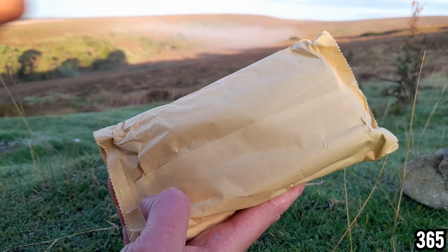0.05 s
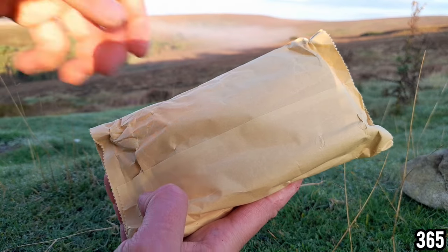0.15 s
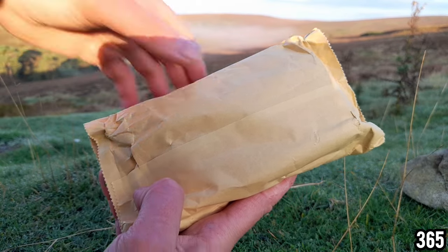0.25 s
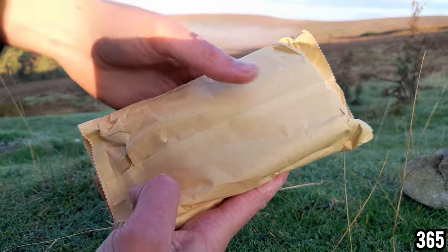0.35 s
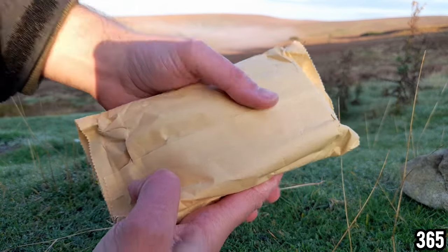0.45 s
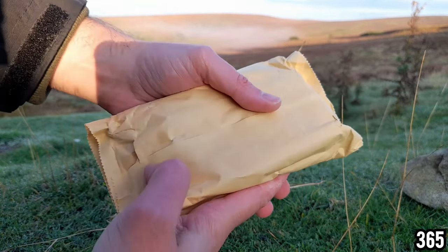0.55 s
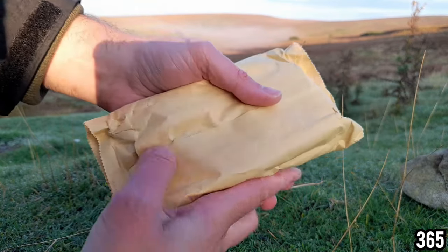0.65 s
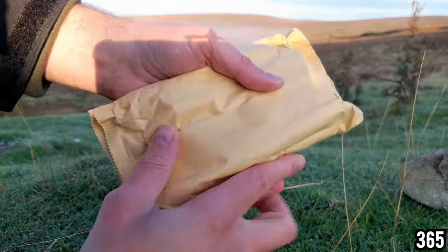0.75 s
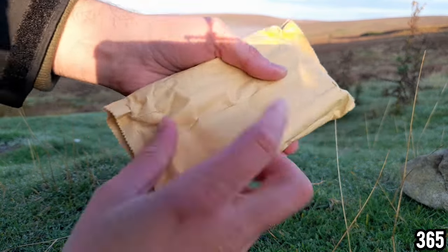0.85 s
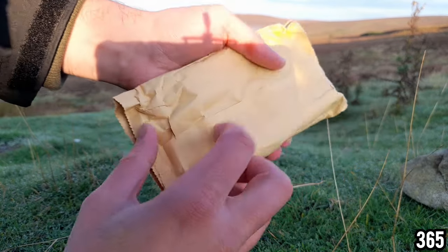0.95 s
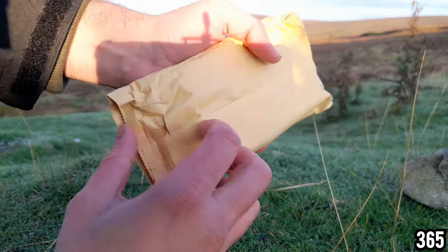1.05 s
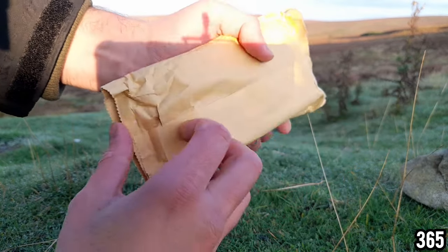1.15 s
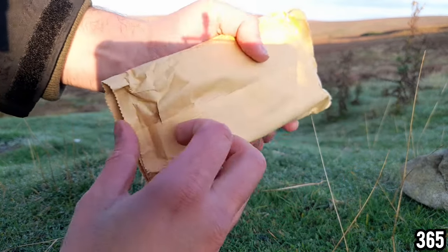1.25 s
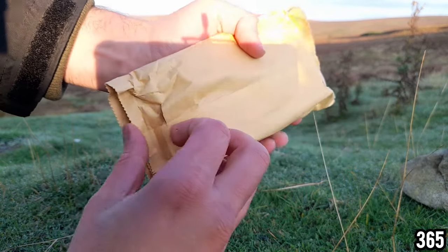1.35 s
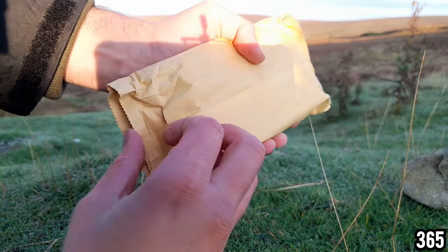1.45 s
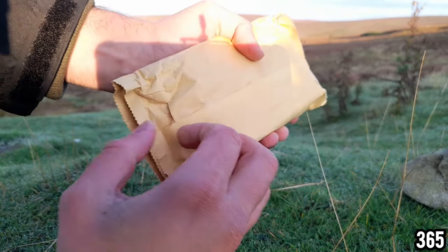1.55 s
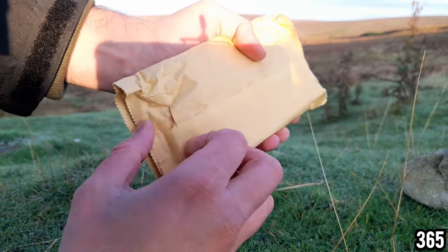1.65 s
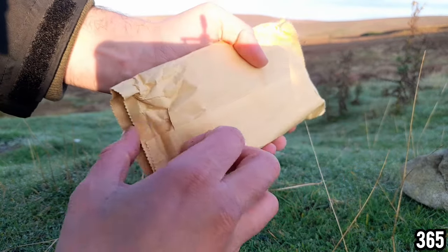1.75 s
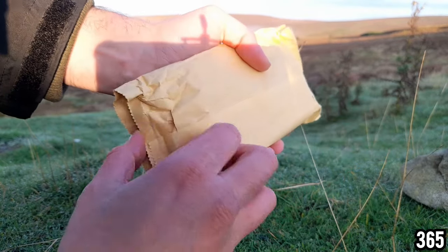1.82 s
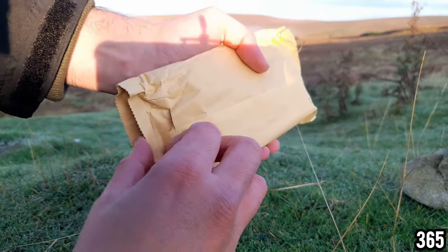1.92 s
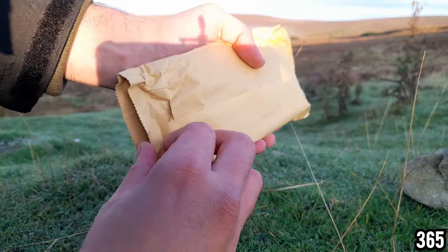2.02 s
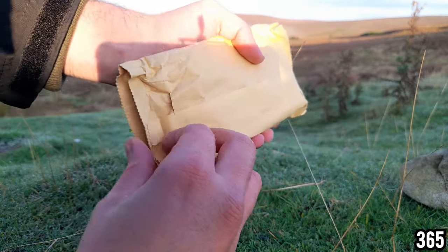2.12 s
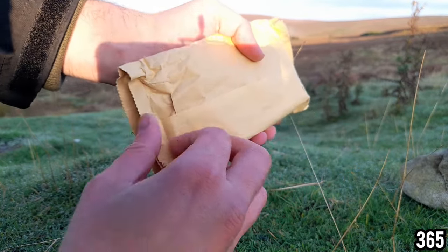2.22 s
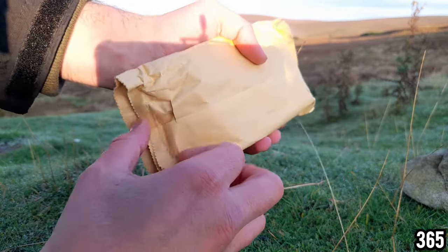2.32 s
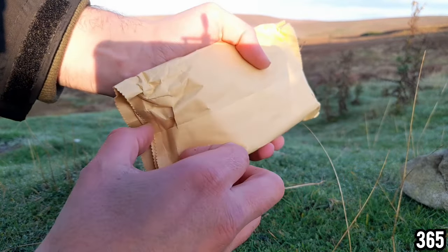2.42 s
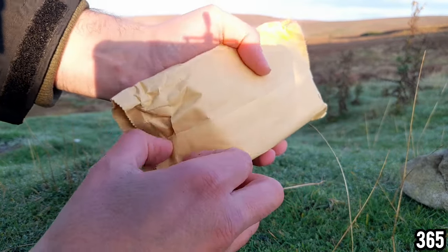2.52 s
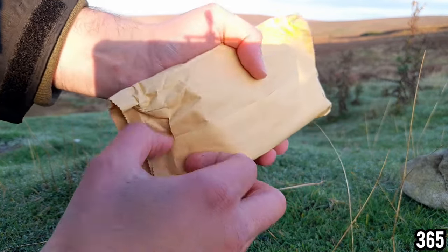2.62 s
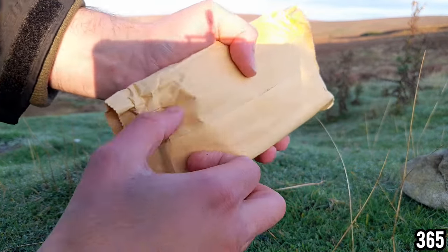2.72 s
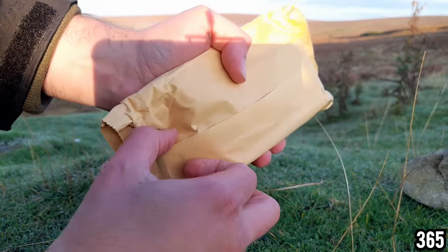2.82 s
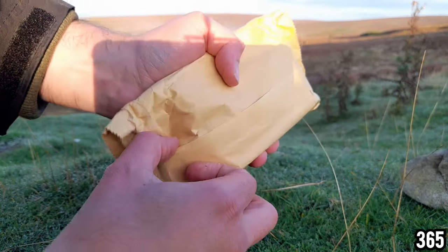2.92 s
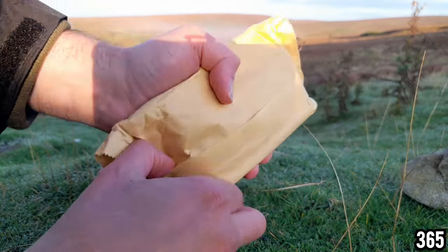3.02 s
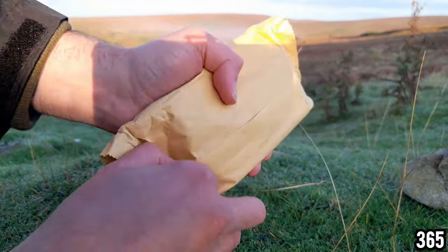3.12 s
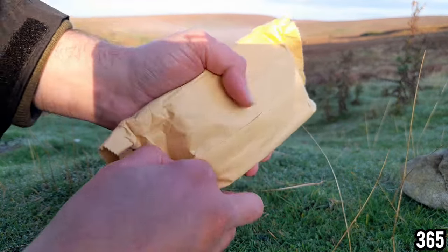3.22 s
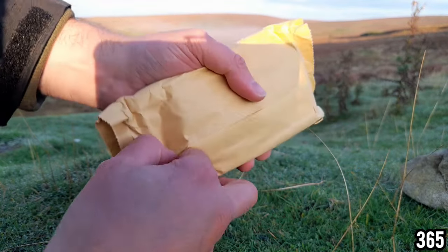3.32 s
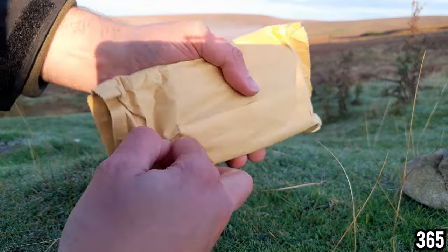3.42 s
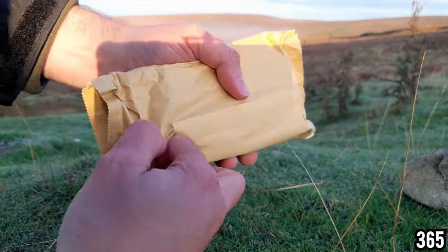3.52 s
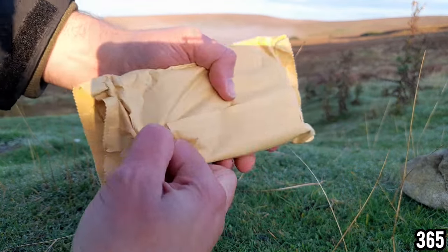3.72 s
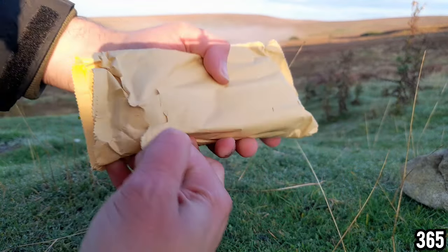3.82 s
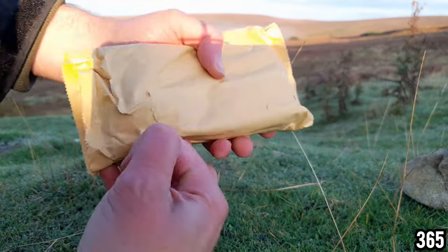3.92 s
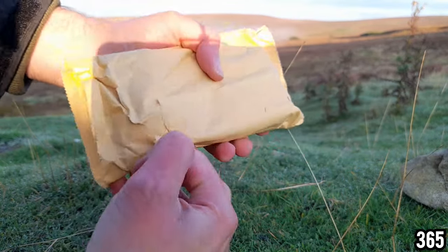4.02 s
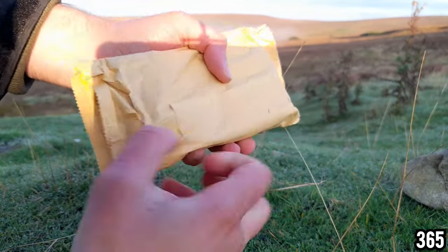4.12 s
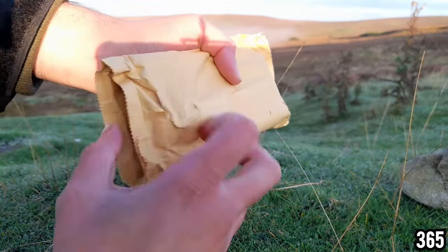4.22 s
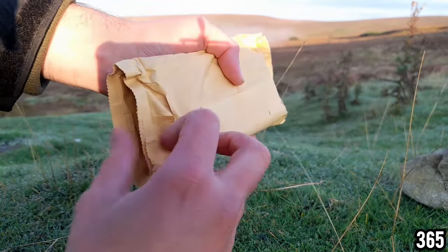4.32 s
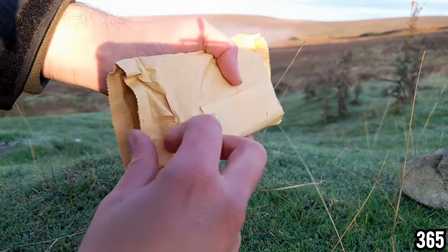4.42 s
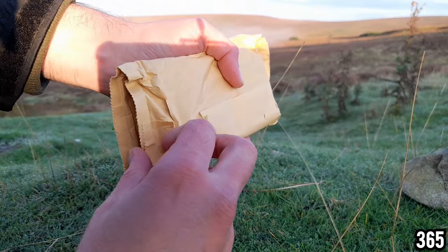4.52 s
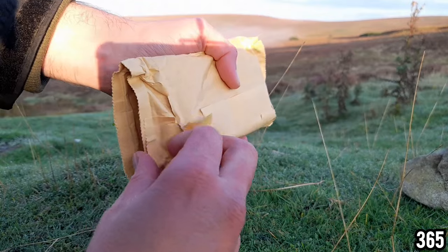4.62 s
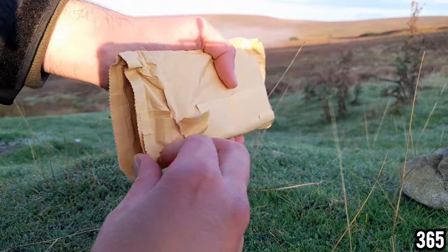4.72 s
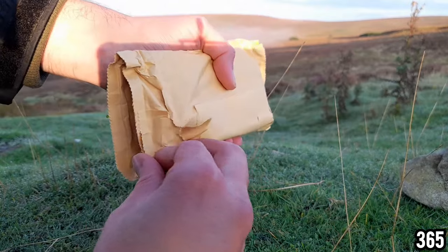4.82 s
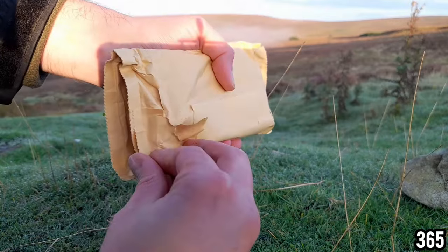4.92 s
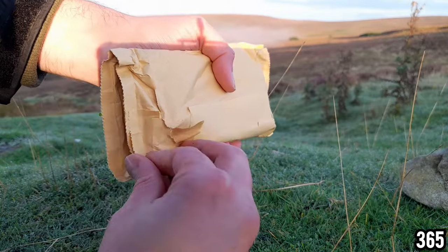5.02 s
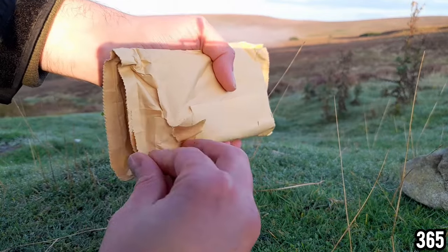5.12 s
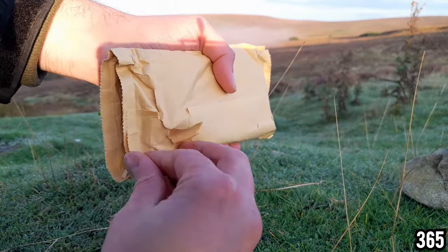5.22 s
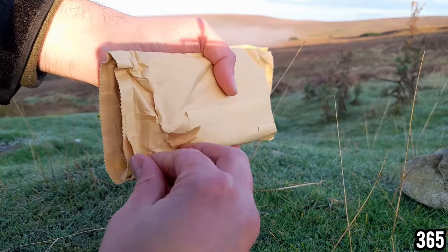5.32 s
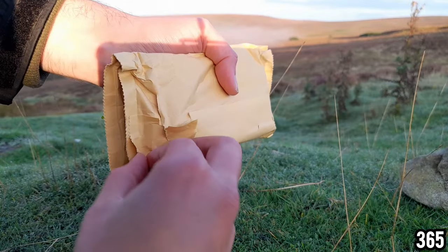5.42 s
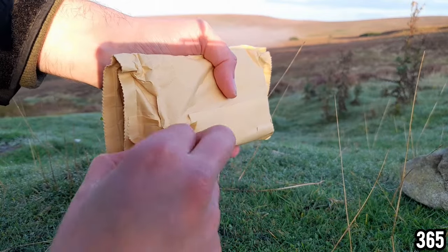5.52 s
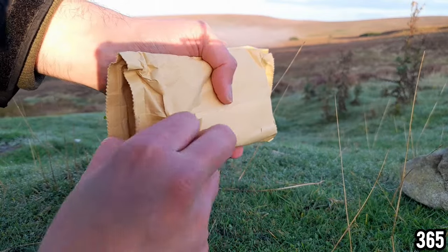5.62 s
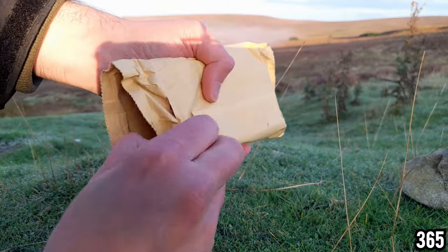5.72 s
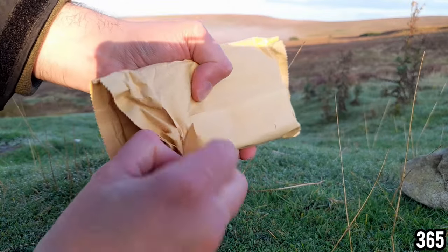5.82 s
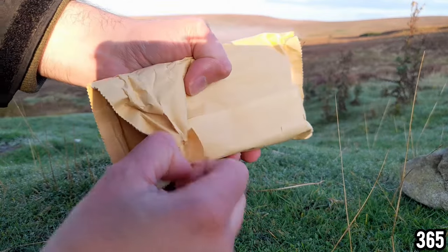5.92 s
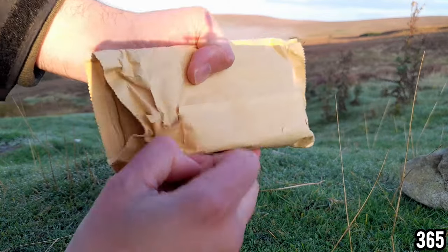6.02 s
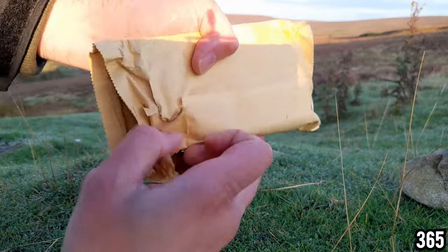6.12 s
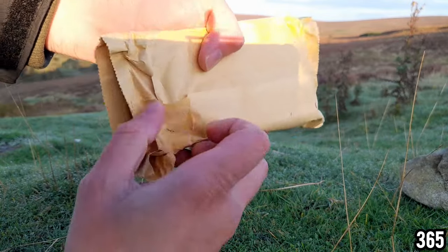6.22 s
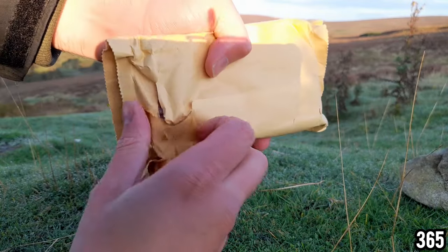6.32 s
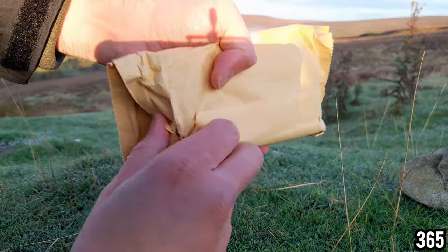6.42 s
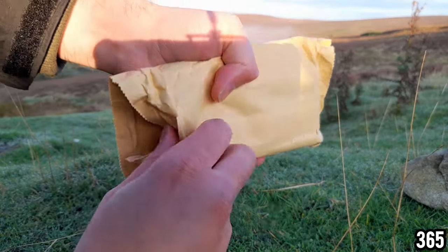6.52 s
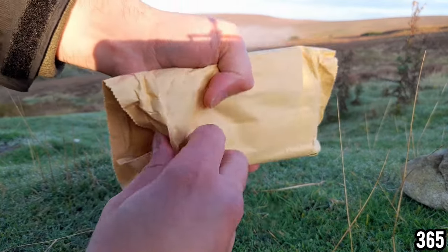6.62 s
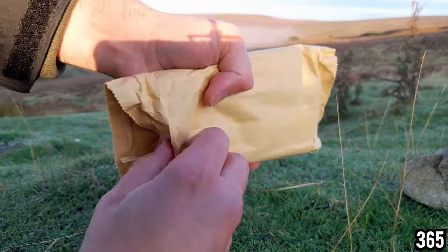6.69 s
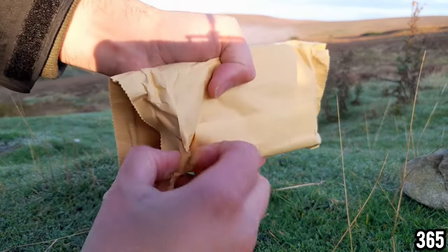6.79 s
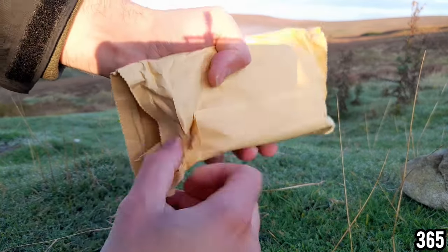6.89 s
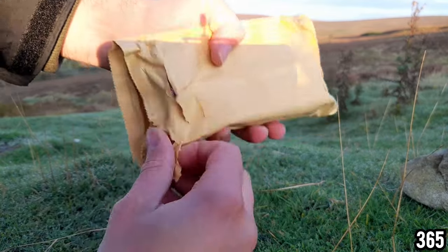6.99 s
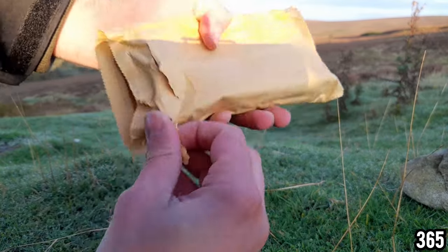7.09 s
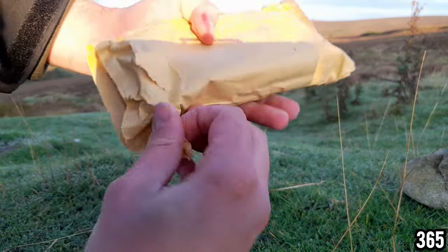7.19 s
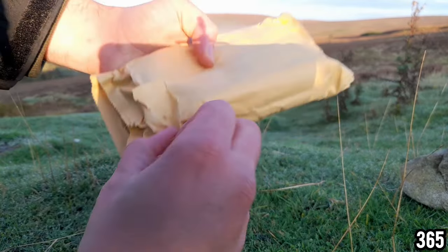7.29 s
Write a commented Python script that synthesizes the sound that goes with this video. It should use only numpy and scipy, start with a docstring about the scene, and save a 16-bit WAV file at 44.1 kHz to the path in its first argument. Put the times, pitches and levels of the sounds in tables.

```python
"""Outdoors on an open moor, hands crinkle, rub and tear a padded paper mailer close to two microphones.
Showers of tiny noise puffs make the dense rustle, and short noise bursts make the creases snap or tick.
Denser puffs make short tears and bright bursts of rustle, a finger drags over the opened pocket, and the
hands rest for a moment.
The mailer is nearer the left microphone; steady noise makes the faint air, and there is no echo."""
import sys
import numpy as np
from scipy import signal
from scipy.fft import rfft, irfft
from scipy.io import wavfile
from scipy.ndimage import uniform_filter1d

SR = 44100
rng = np.random.default_rng(int(sys.argv[2]) if len(sys.argv) > 2 else 0)


def unload_audio(sound):
    """Save the sound as a 16-bit wav file, at the path given as the first command line argument."""
    columns = np.transpose(np.atleast_2d(sound))
    # keep every value between -1 and 1, then stretch to whole-number steps
    steps = np.round(np.clip(columns, -1, 1) * 32767)
    wavfile.write(sys.argv[1], SR, steps.astype(np.int16))


N = 324135


def rustle():
    """Fibres hiss in fine grains, the sheet ticks in coarser ones, and the padding thuds."""
    pad, pocket, sheet, crack, shine = parts()
    layers = [crackle(pad, per_s=53, spread_db=-0.5, grain_s=0.0032, smooth=2.7),
              crackle(pocket, per_s=180, spread_db=1.0, grain_s=0.0018, smooth=1.0),
              crackle(sheet, per_s=250, spread_db=4.0, grain_s=0.0066, smooth=0.93),
              crackle(crack, per_s=1100, spread_db=0.5, grain_s=0.0013, smooth=1.6),
              crackle(shine, per_s=900, spread_db=9.0, grain_s=0.00063, smooth=2.1)]
    return sum(evened(patchy(layer, patchy_db=2.5)) * level for layer, level in zip(layers, handling()))


def handling():
    """Working hands rub, ring and press the paper, which sets the levels of its five parts."""
    # hands at work: time_s, fibre_hiss_db, sheet_ring_db, weight_on_padding_db
    hand_moves = [(0.0, -71, -85, -77.5), (0.18, -61.5, -68.5, -64), (0.4, -59.5, -65, -70),
                  (0.42, -52, -53.5, -66), (0.49, -52.5, -60, -60), (0.51, -48, -45, -44.5),
                  (0.6, -48, -51.5, -56.5), (0.655, -49, -50, -46.5), (0.72, -46.5, -59.5, -65),
                  (0.84, -50, -52.5, -63.5), (1.03, -48, -54, -67.5), (1.13, -43.5, -43, -50),
                  (1.17, -50, -54, -52), (1.19, -59, -63, -74), (1.44, -49.5, -54, -68),
                  (1.52, -60, -64, -66), (1.59, -64.5, -63.5, -83), (1.75, -52.5, -59, -56),
                  (1.9, -63, -65, -71), (1.945, -55, -59.5, -56.5), (1.99, -65, -72.5, -64.5),
                  (2.07, -61, -63, -53.5), (2.18, -77.5, -77, -89), (2.301, -49.5, -49.5, -48.5),
                  (2.43, -57, -63.5, -66), (2.51, -46.5, -48.5, -47), (2.6, -67, -69, -72),
                  (2.681, -44.5, -39, -44), (2.72, -60, -66, -54), (2.77, -44.5, -43, -51),
                  (2.81, -41.5, -46.5, -55), (2.9, -62.5, -73, -65.5), (2.978, -44, -54.5, -52.5),
                  (3.12, -52.5, -58.5, -73), (3.2, -52.5, -60.5, -61), (3.33, -48.5, -57, -70),
                  (3.37, -46.5, -51, -48), (3.48, -48, -54.5, -63.5), (3.66, -50, -57, -60),
                  (3.69, -48, -47, -57), (3.73, -51, -57, -57), (3.78, -41, -46, -50),
                  (3.87, -53, -57, -59), (3.89, -43, -48, -61), (3.97, -58, -60.5, -69),
                  (4.12, -61, -65, -71), (4.15, -70, -73, -76), (4.19, -68.5, -71, -79),
                  (4.331, -58.5, -56.5, -55.5), (4.43, -70, -70, -80), (4.55, -64, -61.5, -63.5),
                  (4.61, -69, -77, -91), (4.651, -60.5, -63, -69), (4.74, -69.5, -74, -80),
                  (4.78, -63.5, -69.5, -90), (4.82, -77.5, -78.5, -85), (4.91, -80, -92.5, -84.5),
                  (4.93, -75.5, -76.5, -84.5), (5.0, -87, -94, -87), (5.14, -90, -101, -87),
                  (5.2, -81.5, -81, -69), (5.28, -74, -85, -87), (5.35, -78.5, -86, -86),
                  (5.44, -65, -64, -85), (5.48, -63, -73, -86), (5.7, -45, -47.5, -59),
                  (5.75, -50.5, -57.5, -65.5), (5.96, -45, -53, -60), (6.08, -54.5, -55.5, -58),
                  (6.139, -46, -50.5, -43), (6.2, -56, -56, -57), (6.26, -43.5, -50, -52.5),
                  (6.34, -57, -60, -56), (6.4, -50.5, -53.5, -51), (6.48, -49.5, -52.5, -52),
                  (6.55, -62, -63, -61), (6.6, -57.5, -60, -61.5), (6.67, -68.5, -71, -73),
                  (6.75, -53, -65, -74), (6.8, -65, -60, -67), (6.85, -59, -58.5, -78),
                  (6.98, -46, -49, -59), (7.05, -54.5, -57, -69), (7.17, -42, -48, -48),
                  (7.23, -45, -50.5, -60.5), (7.35, -45.5, -43, -55)]
    # the rustle's shine over its hiss: time_s, level_db
    shine_over_hiss = [(0, 4), (0.5, -3), (1.4, -3), (2.8, -2), (3.9, 0.5), (4.6, -1), (5.3, 2.5), (6.1, 0),
                       (6.9, 1.5), (7.35, -3)]
    pocket_over_weight_db, padding_over_weight_db = -3.5, -2.5
    ring_share = 0.4  # how far the pocket's level moves from the weight towards the ring

    t = np.arange(N) / SR
    time_s, *columns = np.transpose(hand_moves)
    hiss_db, ring_db, weight_db = (np.interp(t, time_s, column) for column in columns)
    pad_db = weight_db + padding_over_weight_db
    pocket_db = weight_db + ring_share * (ring_db - weight_db) + pocket_over_weight_db
    shine_db = hiss_db + np.interp(t, *np.transpose(shine_over_hiss))
    return gain_of([pad_db, pocket_db, ring_db, hiss_db, shine_db])


def snaps():
    """Each buckling crease is a burst about a millisecond long that excites all five parts at once."""
    time_s, pocket_db, sheet_db, crack_db, crack_hz, shine_db, lean_db = creases()
    count = len(time_s)
    # the padding follows the pocket 9.5 dB lower, with an uneven spread of 7 dB
    pad_db = pocket_db - 9.5 + 7 * rng.standard_normal(count)
    shine_hz = rng.uniform(8400, 15000, count)

    t = np.arange(4096) / SR
    hz = np.fft.rfftfreq(4096, 1 / SR)
    levels = pad_db, pocket_db, sheet_db, crack_db, shine_db
    shapes = [1, 1, 1, favour(crack_hz, hz), favour(shine_hz, hz)]
    bursts_s = 0.00092, 0.0012, 0.00037, 0.00048, 0.00061  # time each burst takes to reach its peak
    out = np.zeros((2, N + 4096))
    for taps, db, shape, burst_s in zip(parts(), levels, shapes, bursts_s):
        envelope = (t / burst_s * np.exp(-t / burst_s))[:600]
        burst = rng.standard_normal((count, 2, 600)) * envelope
        hits = irfft(rfft(burst, 4096) * rfft(taps, 4096) * shape, 4096)
        hits = hits / abs(hits).max(axis=2, keepdims=True) * gain_of(db)[:, None, None]
        for at, hit in zip(np.round(time_s * SR).astype(int), hits):
            out[:, at:at + 4096] += hit

    # creases lie at different spots: the newest one sets the lean, from half a millisecond before it
    newest = np.searchsorted(np.sort(time_s), np.arange(N) / SR + 0.0005) - 1
    newest = np.maximum(newest, 0)
    half_each = np.array([[0.5], [-0.5]])  # left gains half the lean, right loses half
    return microphones(out[:, :N]) * gain_of(lean_db[newest] * half_each)


def creases(count=130):
    """Creases at set times, and small ones at random times whose strength follows the rustle."""
    # creases at set times, from loud snaps to faint ticks;
    # peaks are those before the microphones, lean is extra left over right:
    # time_s, pocket_peak_db, sheet_peak_db, crack_peak_db, crack_pitch_hz, shine_peak_db, lean_db
    set_creases = [(0.422, -43, -33.5, -43, 4700, -50, -1), (0.497, -38, -32, -30.5, 3980, -41, 1),
                   (0.518, -38, -35, -26, 3400, -41, -9), (0.54, -44, -18.5, -18, 3900, -27, 0),
                   (0.559, -56, -34, -30, 5000, -42, -3), (0.646, -38, -28, -24, 4000, -29, 1),
                   (0.666, -41, -27, -31, 2800, -45, -5), (0.689, -49, -25.5, -24, 3740, -42, -4),
                   (0.842, -40.5, -27, -44, 4600, -47, 0), (0.911, -40, -43, -36, 5200, -27, -6),
                   (1.003, -68, -37, -37, 4300, -44, -16), (1.09, -51, -23, -37, 3100, -33, -5),
                   (1.126, -32.5, -17.5, -16, 2600, -29, -5.5), (1.151, -51, -42, -21, 4700, -29.5, 0),
                   (1.165, -37, -22.5, -41, 3300, -32, -5), (1.375, -61, -34.5, -26, 4230, -34, -3),
                   (1.494, -44, -35.5, -31, 3830, -48, 1.5), (2.21, -48, -54, -48, 4800, -49, 6.5),
                   (2.299, -56, -46, -28.5, 3200, -36, -4), (2.397, -54, -56, -32, 4700, -35, 2),
                   (2.501, -27.5, -24.5, -23, 4800, -27, -10), (2.66, -35.5, -36, -32, 4270, -36, -2),
                   (2.674, -45, -28, -34, 4400, -28.5, -4), (2.689, -47, -28, -29, 4800, -25.5, -1),
                   (2.714, -56, -30, -27.5, 3980, -42, -7), (2.75, -35, -25, -30, 4000, -34, -4),
                   (2.768, -33.5, -17, -29, 5600, -29, 4.5), (2.83, -54, -32.5, -37, 4900, -37, -5),
                   (2.926, -67, -40, -35, 3100, -55, 2), (3.041, -59, -50, -30, 5000, -26, -4),
                   (3.083, -62, -41, -34, 6000, -29, -3), (3.22, -67, -53, -37, 4500, -32.5, -2),
                   (3.259, -66, -29, -25.5, 4100, -26, -4), (3.296, -55, -25, -29, 3900, -43, 1),
                   (3.313, -46, -28, -37, 3200, -45, -6), (3.347, -45, -24, -22.5, 4830, -25, -5),
                   (3.365, -46, -29, -20, 3100, -37, -3), (3.375, -19, -7, -26, 4800, -17.5, -2),
                   (3.414, -46, -23, -26, 3100, -34, -6), (3.467, -43, -29, -33, 4100, -25, -5),
                   (3.531, -47, -28, -45, 2600, -41, -6), (3.575, -60, -36, -28, 5500, -30, -4),
                   (3.635, -40, -18.5, -18.5, 5030, -22.5, -5), (3.664, -45, -21.5, -28, 3500, -37, 6),
                   (3.681, -45, -18.5, -23.5, 5600, -4.5, -8.5), (3.688, -27, -16.5, -22, 6130, -17, -9),
                   (3.692, -33, -16.5, -27, 4800, -38, 0), (3.757, -34, -23, -38, 3100, -45, 0),
                   (3.79, -27, -25, -9.5, 5760, -11, -8), (3.811, -35, -16, -10, 6000, -20, 3),
                   (3.871, -58, -34, -43, 4700, -44, 1), (3.888, -45, -23, -30, 5200, -20.5, -0.5),
                   (3.906, -54, -32, -24, 5300, -30, 4), (4.201, -64, -38, -43, 4260, -43, 0),
                   (4.222, -68, -38, -29.5, 4600, -31, 1), (4.238, -60, -36, -37, 4700, -34, 2),
                   (4.295, -55, -32.5, -44, 3400, -45, -1), (4.338, -55, -34.5, -37, 2800, -42, -4.5),
                   (4.831, -89, -76.5, -48.5, 5680, -56.5, -9), (5.039, -93.5, -79, -52, 6100, -48, -4.5),
                   (5.069, -88, -71, -51.5, 5200, -53.5, 2), (5.128, -91.5, -79.5, -56.5, 5280, -55, -4.5),
                   (5.198, -58, -56, -36, 5170, -33.5, 3.5), (5.271, -87.5, -69, -56, 5800, -49.5, 2),
                   (5.305, -83, -70, -48.5, 5300, -58, -3), (5.372, -89.5, -61, -55, 6010, -47, 2),
                   (5.415, -85.5, -64.5, -48.5, 5100, -43.5, 0), (5.631, -55, -33, -29, 6030, -20.5, -4),
                   (5.682, -61, -30, -17, 5130, -22.5, -4), (5.701, -35.5, -24, -35, 4600, -36, -9),
                   (5.795, -37.5, -24, -13, 4260, -12, 1.5), (5.862, -39.5, -25.5, -16.5, 4670, -27, 2),
                   (5.899, -48, -23.5, -20, 3830, -29, -4), (5.918, -53, -25, -22, 5300, -31, -4),
                   (5.959, -27, -11.5, -21.5, 5100, -13, 7), (5.987, -28, -28, -19, 6000, -18, -4),
                   (6.056, -54, -33, -32, 4400, -31, -1), (6.391, -59, -47, -45, 5200, -28.5, 1),
                   (6.456, -56, -51, -33, 5100, -30, -2), (6.471, -40, -23, -32, 4200, -34, 2),
                   (6.499, -46, -23.5, -36, 4850, -43, 0.5), (6.585, -70, -39, -36, 6500, -38, -4),
                   (6.826, -73, -46, -37.5, 4500, -38, 1), (6.894, -55, -39, -30.5, 5900, -25, 5),
                   (6.998, -67, -30, -42, 3800, -31, 4.5), (7.084, -60, -30, -36, 2900, -32, -2),
                   (7.096, -63, -23, -45, 3200, -32, -7), (7.147, -48, -35, -24, 5100, -23.5, -2),
                   (7.163, -59, -28.5, -25, 4870, -32, -12), (7.205, -53, -25, -40, 4500, -44, -6),
                   (7.252, -44, -28.5, -40, 3400, -30, 0), (7.282, -51, -25.5, -21.5, 3730, -37, -2),
                   (7.332, -39, -30, -31, 3300, -38, 6)]
    # small creases: peaks of pocket, sheet, crack and shine over the rustle's levels
    over_rustle_db = np.array([11, 11.4, 14.2, 13.8])
    peak_spread_db, lean_spread_db = 3.5, 5.5
    low_hz, high_hz = 2890, 6500  # range of the crack's pitch

    moment, pitch = rng.random((count, 2)).T
    spread = rng.standard_normal((count, 5)).T
    place = moment * (N - 1)
    rustle_db = 20 * np.log10(handling()[1:, place.astype(int)])
    peaks_db = rustle_db + over_rustle_db[:, None] + peak_spread_db * spread[:4]
    *lower_db, shine_db = peaks_db
    crack_hz = low_hz * (high_hz / low_hz) ** pitch
    small = np.transpose([place / SR, *lower_db, crack_hz, shine_db, lean_spread_db * spread[4]])
    rows = np.r_[set_creases, small]
    return rows[np.argsort(rows[:, 0])].T


def favour(pitch_hz, hz):
    """A small piece of paper favours one pitch, over about an octave."""
    centre = pitch_hz[:, None, None]
    detune = hz / centre - centre / (hz + 1)  # the 1 avoids dividing by zero
    return 1 / (1 + 1j * 1.01 * detune) ** 2


def rips():
    """In short tears and bright bursts of rustle, fibres rub or break so densely that grains almost merge."""
    layers = [crackle(taps, per_s=1300, spread_db=-1.0, grain_s=0.00019, smooth=1.8) for taps in parts()]
    return sum(evened(patchy(layer, patchy_db=2.0)) * level for layer, level in zip(layers, rip_levels()))


def rip_levels():
    """Tears and bright bursts swell at their own pace and stop fast, which sets the five parts' levels."""
    # short tears and bright bursts of rustle; a positive fade means getting quieter along the way:
    # start_s, end_s, rise_s, padding_db, pocket_db, sheet_db, crack_db, shine_db, fade_over_length_db
    dense_bursts = [(0.798, 0.829, 0.016, -79, -77, -60, -41.5, -45.5, -4.5),
                    (2.495, 2.515, .005, -66, -29.5, -45, -38, -34.5, 2),
                    (3.782, 3.85, .002, -39, -33, -26, -26.5, -24, 7),
                    (4.162, 4.185, 0.0097, -80, -82, -62, -55, -50.5, 1),
                    (4.199, 4.248, .002, -56.5, -68.5, -49, -53.5, -51, -0.5),
                    (5.179, 5.2, .008, -66, -78, -60.5, -60, -58, 4),
                    (5.958, 6.012, .001, -46, -41, -37.5, -31.5, -32.5, -2),
                    (6.726, 6.779, 0.022, -65, -73, -46.5, -49, -40.5, 1),
                    (6.879, 6.907, 0.016, -72, -60, -46, -49, -40.5, -4)]
    stop_s = 0.0073
    t = np.arange(N) / SR
    level = np.zeros((5, N))
    for start, end, rise, *db, fade_db in dense_bursts:
        part = slice(round(start * SR), round(end * SR))
        since_start = t[part] - start
        edges = np.clip(np.minimum(since_start / rise, (end - t[part]) / stop_s), 0, 1)
        fade = gain_of(-fade_db * since_start / (end - start))
        level[:, part] = gain_of(db)[:, None] * edges * fade
    return level


def drag():
    """A finger's skin on paper excites the hollow of the opened pocket."""
    # resonances of the hollow: pitch_hz, width_hz, level_db
    hollow_tones = [(806, 150, -2), (1083, 320, -11.5), (490, 120, -10)]
    start_s, fall_s, end_s = 6.08, 6.2355, 6.4855
    top_db, end_db = -46.5, -64.5
    edge_s = 0.035  # fade in and out

    hz = np.fft.rfftfreq(4096, 1 / SR)
    t = np.arange(N) / SR
    gain = sum(gain_of(db) / (1 + (2 * (hz - f) / width) ** 2) for f, width, db in hollow_tones)
    skin = crackle(colour(gain), per_s=400, spread_db=2.0, grain_s=0.0024, smooth=2.6)
    level = gain_of(np.interp(t, [fall_s, end_s], [top_db, end_db]))
    fade = np.clip(np.minimum(t - start_s, end_s - t) / edge_s, 0, 1)
    return skin * level * fade


def air():
    """Faint steady wash of the open moor and the microphones' own hiss."""
    # colour of the still air, only relative: pitch_hz, level_db (per Hz)
    air_colour = [(18, -50), (30, 6.5), (239, 5.5), (404, -21.5), (2480, -26), (5040, -7), (8080, -16.5),
                  (9710, -7.5), (16000, -23.5)]
    level_db = -77
    hz = np.fft.rfftfreq(N, 1 / SR)
    left, other = rfft(rng.standard_normal((2, N))) * gain_of(read(air_colour, hz))
    same = 1 / (1 + (hz / 350) ** 2)  # mainly the bass is shared
    right = same * left + np.sqrt(1 - same ** 2) * other
    return gain_of(level_db) * evened(irfft([left, right], N))


def crackle(taps, per_s, spread_db, grain_s, smooth):
    """Tiny releases of uneven size, each a puff of noise, seen from two sides, over a smooth rub."""
    size = gain_of(spread_db * np.minimum(rng.exponential(1, N), 5))
    releases = size * (rng.random(N) < per_s / SR)
    decay = np.exp(-np.arange(600) / (grain_s * SR))
    puffs = signal.oaconvolve(releases, decay)[:N]
    drive = (evened(puffs) + smooth) * rng.standard_normal((2, N))
    return evened(signal.oaconvolve(drive, taps[None])[:, :N])


def patchy(x, patchy_db):
    """The contact wanders over the sheet, so small areas of colour swell and fade."""
    z = signal.stft(x, nperseg=512, noverlap=384)[2]
    field = rng.standard_normal(z.shape[:0:-1]).T  # both sides share one field of pitch and time
    field = uniform_filter1d(field, size=5, axis=0)
    field = evened(uniform_filter1d(field, size=12, axis=1))
    return signal.istft(z * gain_of(patchy_db * field), nperseg=512, noverlap=384)[1][:, :N]


def parts():
    """The mailer's colour, split by pitch into padding, pocket, sheet, crack and shine."""
    # colour of the mailer, only relative: pitch_hz, level_db (per Hz)
    paper_colour = [(18, -52), (30, -25.5), (86, -19), (170, -7), (340, -8.5), (880, -12), (1100, -4),
                    (1500, 2.5), (2100, -7), (6500, -7.5), (8300, -10.5), (10200, -9), (14500, -10.5),
                    (16000, -17)]
    # upper edges of padding, pocket, sheet and crack, in Hz; the shine lies above
    part_tops = 330, 850, 2200, 7500
    hz = np.fft.rfftfreq(4096, 1 / SR)
    below = [1 / (1 + (hz / edge) ** 8) for edge in part_tops]
    shares = np.diff([0 * hz] + below + [0 * hz + 1], axis=0)
    gain = gain_of(read(paper_colour, hz))
    return [colour(gain * np.sqrt(np.maximum(share, 0))) for share in shares]


def microphones(views):
    """The right microphone hears a partly different side of the sheet, later and shaded."""
    # left microphone over right: pitch_hz, level_db
    left_over_right = [(60, 3), (200, 2.5), (350, 2.5), (800, 3), (1400, 5.5), (2300, 1), (6500, 1),
                       (8300, 5), (10000, 13.5), (13000, 11)]
    # likeness of what the two microphones hear: pitch_hz, likeness (0 to 1)
    likeness = [(60, 0.32), (300, 0.8), (1000, 0.89), (2000, 0.28), (4000, 0.36), (10000, 0.057)]
    right_lag_s = 0.00018
    hz = np.fft.rfftfreq(N + 1000, 1 / SR)  # the extra samples keep the delay from wrapping round
    left, other = rfft(views, N + 1000)
    same = np.clip(read(likeness, hz), 0, 1)
    lean = gain_of(read(left_over_right, hz) / 2)  # half on each side
    right = same * left + np.sqrt(1 - same ** 2) * other
    right = right * np.exp(-2j * np.pi * hz * right_lag_s)
    return irfft([left * lean, right / lean], N + 1000)[:, :N]


def gain_of(db):
    """Turns decibels into gain."""
    return 10 ** (np.asarray(db) / 20)


def evened(x):
    """Scales to an rms of 1."""
    return x / np.sqrt(np.mean(x ** 2) + 1e-20)


def read(points, hz):
    """Reads a table of pitch and value along a log pitch axis."""
    f, value = np.transpose(points)
    return np.interp(np.log(hz + 1), np.log(f + 1), value)


def colour(gain):
    """Filter taps that respond at once (minimum phase), for a gain given on 2049 bins."""
    both_halves = np.r_[gain, gain[-2:0:-1]]
    log = np.log(np.maximum(both_halves, 1e-4))
    return np.fft.ifft(np.exp(log - 1j * signal.hilbert(log).imag)).real[:2048]


def scene():
    """The mailer in the hands, in still air."""
    return microphones(rustle() + rips() + drag()) + snaps() + air()


def record(dry):
    """The recorder cuts rumble below 38 Hz, then limits the band at 15900 Hz."""
    rumble_cut = signal.butter(2, 38, "high", fs=SR, output="sos")
    thinned = signal.sosfilt(rumble_cut, dry)
    band_limit = signal.firwin(511, 15900, window=("kaiser", 9), fs=SR)
    return signal.oaconvolve(thinned, band_limit[None], "same")


dry = scene()
out = record(dry)
unload_audio(out)
```